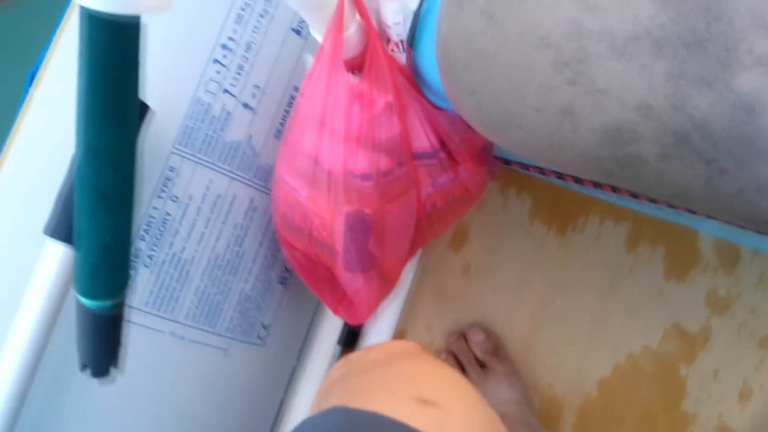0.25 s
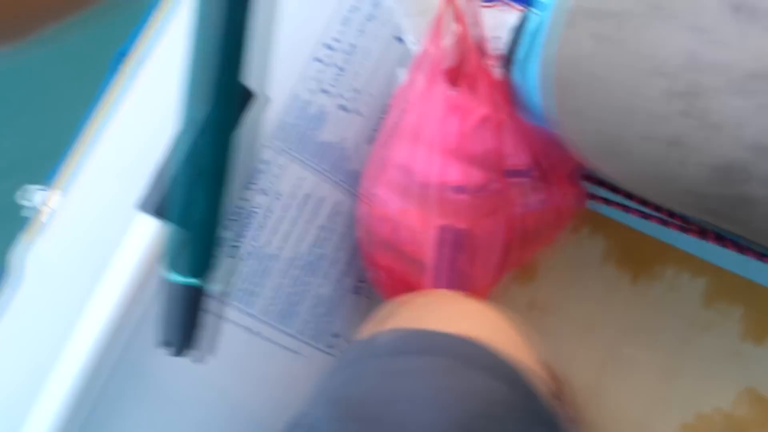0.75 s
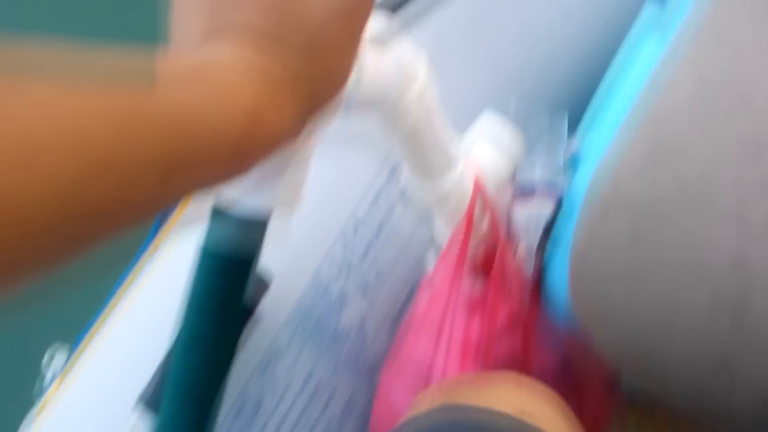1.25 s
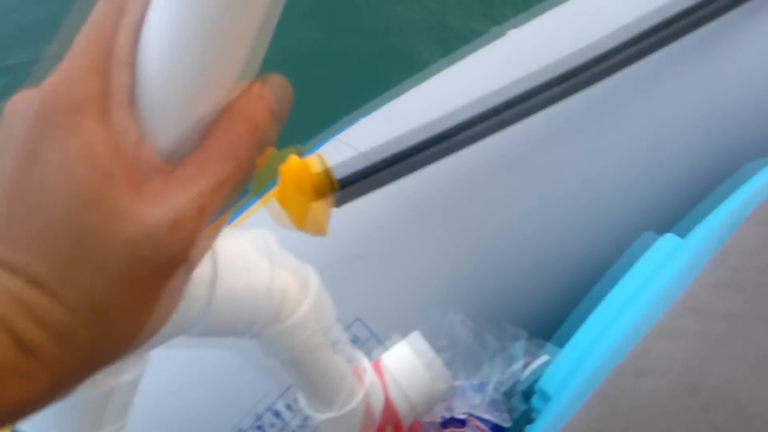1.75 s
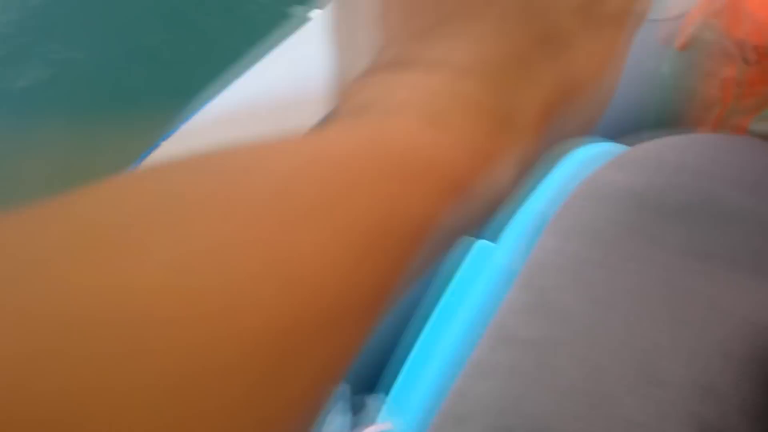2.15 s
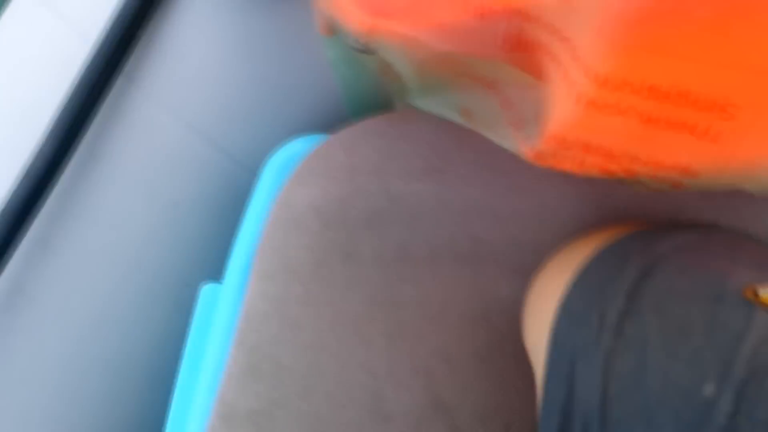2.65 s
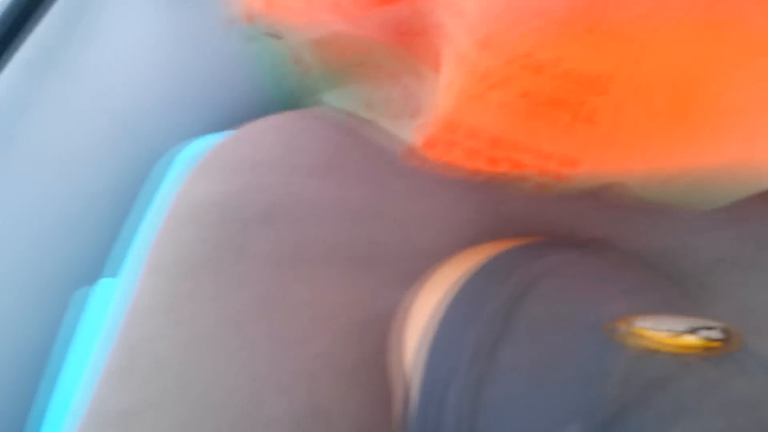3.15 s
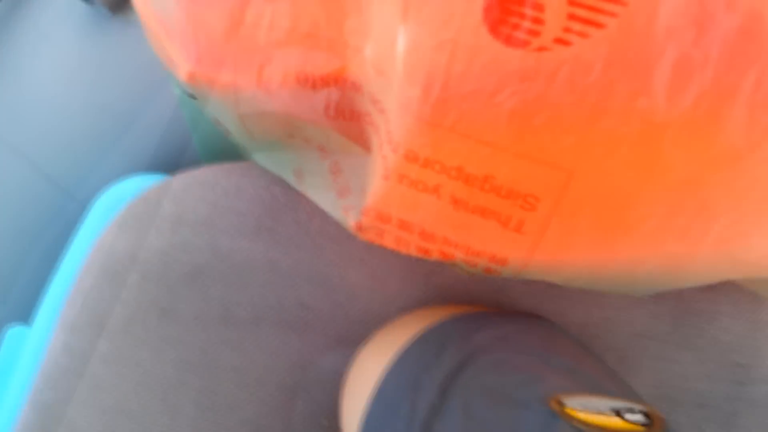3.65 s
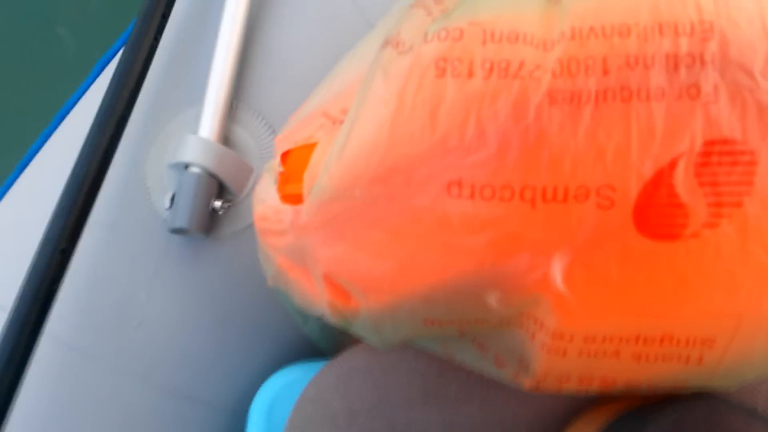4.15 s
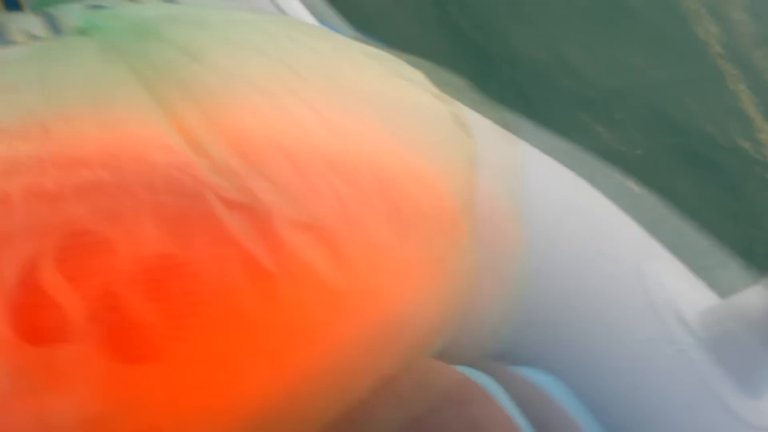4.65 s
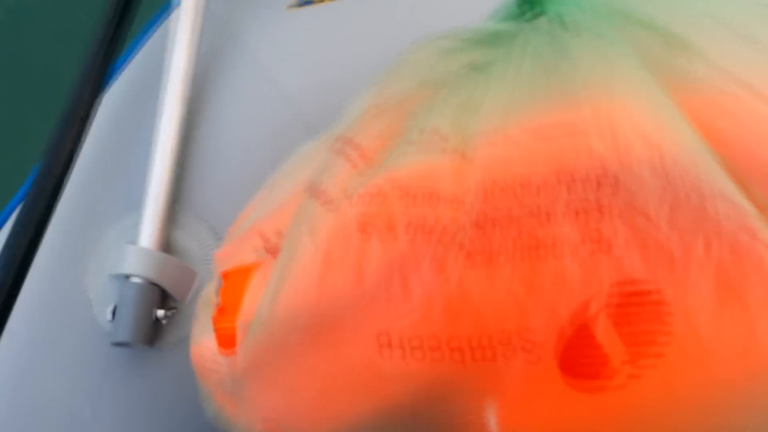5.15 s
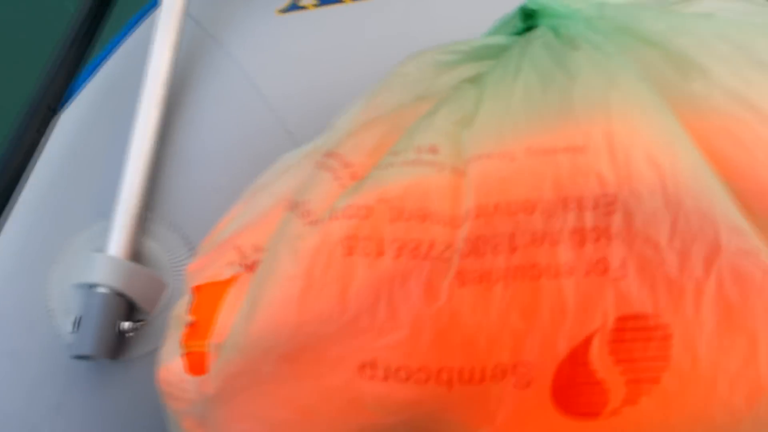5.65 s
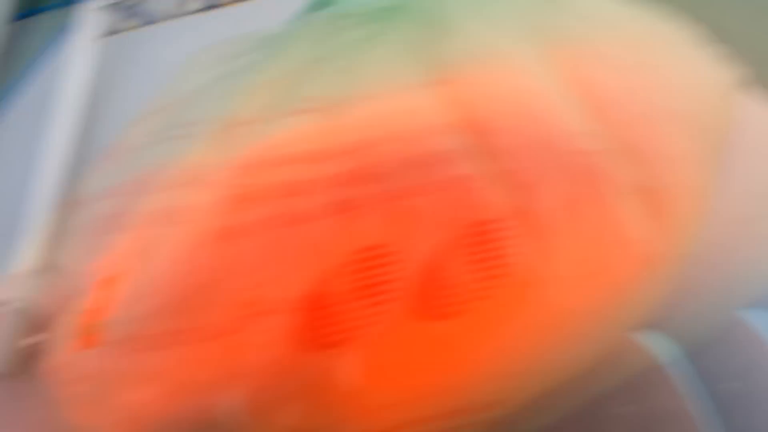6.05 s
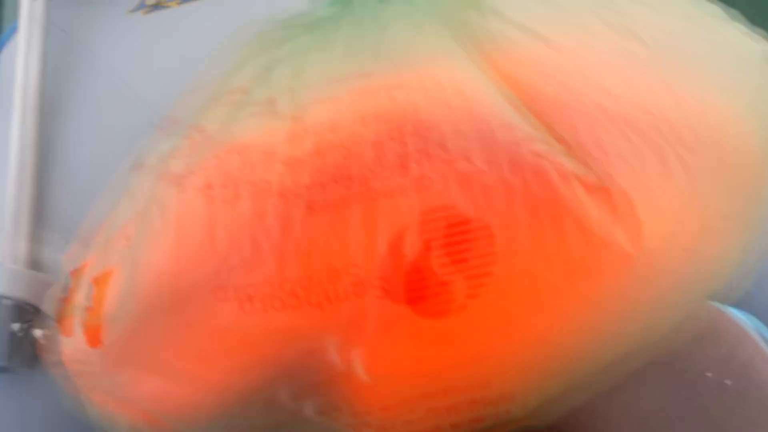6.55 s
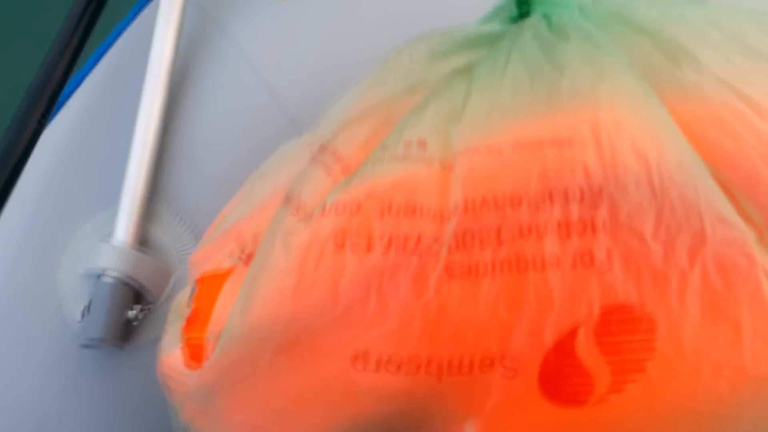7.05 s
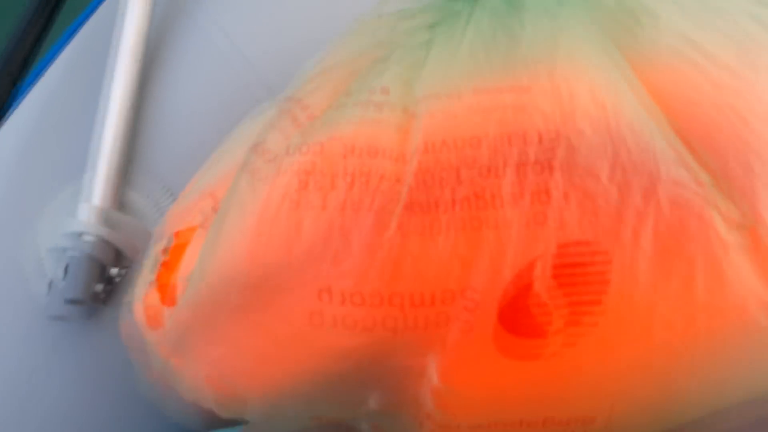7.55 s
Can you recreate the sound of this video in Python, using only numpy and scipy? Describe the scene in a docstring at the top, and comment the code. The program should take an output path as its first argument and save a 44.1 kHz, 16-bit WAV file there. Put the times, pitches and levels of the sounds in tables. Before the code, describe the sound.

Hollow knocks and fabric rubs under buffeting wind, then whirring, clanking pulls of an outboard starter cord, ratcheting back twice, the engine never firing.

```python
"""Wind buffets the microphone throughout, while things knock and rub against the hull of a small inflatable boat at sea.
Then the starter cord of an outboard motor is pulled three times and the engine does not catch.
The pulls whir and clank; after the first two the pawl ratchets as the cord rewinds. Wind, sea, rubs and scraping are
shaped noise; knocks, clanks and ticks strike resonances; the loudest moments overload the microphone's converter."""
import sys
import numpy as np
from scipy import signal
from scipy.io import wavfile
from scipy.ndimage import uniform_filter1d

SR = 44100
rng = np.random.default_rng(int(sys.argv[2]) if len(sys.argv) > 2 else 0)


def to_wav(sig):
    """Store sig (one row per channel, or 1-D mono) as 16-bit WAV at the path in sys.argv[1].

    Samples outside -1..1 are clipped; the rate is SR.
    """
    pcm = np.clip(np.atleast_2d(sig), -1, 1) * 32767
    pcm = np.round(pcm).astype(np.int16)
    wavfile.write(sys.argv[1], SR, pcm.T)  # frames by channels


N = 343980

# Table levels are relative; each function adds its own gains.
RELEASE_S = 0.0054   # time constant at the end of a swell


def amp(db):
    """dB to gain."""
    return 10 ** (np.asarray(db) / 20)


def rms_one(x):
    """Scale to unit rms."""
    return x / np.sqrt(np.mean(x ** 2) + 1e-20)


def in_time(rows, outside=None):
    """Columns of a curve table, one value per sample."""
    s, *columns = np.transpose(rows)
    return [np.interp(np.arange(N) / SR, s, c, left=outside, right=outside) for c in columns]


def drift(rate):
    """Slow chance with about `rate` changes a second; spread about 1."""
    r = np.exp(-40 * np.pi * rate / SR)   # pole near `rate` Hz for noise at SR / 20 samples a second
    white = rng.standard_normal(N // 20 + 2002)
    slow = signal.lfilter([1], [1, -2 * r, r * r], white)[2000:]
    return np.interp(np.arange(N) / 20, np.arange(len(slow)), rms_one(slow - slow.mean()))


def wander(x, share, rate):
    """Play a sound a little faster or slower by turns, so that its resonances glide."""
    lag = np.cumsum(share * drift(rate))
    centred_lag = lag - uniform_filter1d(lag, size=SR // 4)
    return np.interp(np.arange(N) + centred_lag, np.arange(N), x)


def band(x, low_hz, high_hz, order=2):
    """Butterworth band-pass."""
    return signal.sosfilt(signal.butter(order, [low_hz, high_hz], "band", fs=SR, output="sos"), x)


def coloured(spectrum, patchy_db, rate):
    """Half-octave bands of noise at the levels of a spectrum, each flickering; rms 1."""
    hz, level_db = np.transpose(spectrum)
    edges = hz[0] * 2 ** np.arange(0, np.log2(hz[-1] / hz[0]) + .1, .5)
    white, together, out = rng.standard_normal((2, N)), drift(rate), 0
    for k, (low, high) in enumerate(zip(edges, edges[1:])):
        centre_db = np.interp(np.log(low * high) / 2, np.log(hz), level_db)
        flicker_db = patchy_db * (together + 0.75 * drift(rate))
        out = out + amp(centre_db + flicker_db) * band(white[k % 2], low, high)
    return rms_one(out)


def treble_hiss(flicker_db, rate):
    """Bright flickering hiss; rms 1."""
    white = rng.standard_normal(N)
    return rms_one(band(white, 4200, 21000, order=3) * amp(flicker_db * drift(rate)))


def resonate(x, hz, width_hz):
    """Two-pole resonance, gain about 1 on top."""
    r = np.exp(-np.pi * width_hz / SR)
    zeros = np.array([1, 0, -1]) * (1 - r * r) / 2
    return signal.lfilter(zeros, [1, -2 * r * np.cos(2 * np.pi * hz / SR), r * r], x)


def through(x, peaks):
    """Parallel resonances with alternating signs."""
    return sum((-1) ** k * amp(db) * resonate(x, hz, width) for k, (hz, width, db) in enumerate(peaks))


def bursts(times, levels_db, lengths_ms, tail):
    """Envelope of contacts: sudden start, held for the length, then dying with time constant tail x length."""
    out = np.full(N, 1e-9)
    for s, db, ms in zip(times, levels_db, lengths_ms):
        hold = max(ms, .3) * SR / 1000   # samples
        start = round(s * SR)
        n = np.arange(min(int(hold * (1 + 8 * tail)), N - start))
        out[start:start + len(n)] += amp(db) * np.exp(-np.maximum(n - hold, 0) / (hold * tail))
    return out


def swells(start_s, length_s, levels_db, rise, fade_db):
    """Envelope of strokes: smooth rise over a share of the length, slow fall over the rest, quick release."""
    t, out = np.arange(N) / SR, np.full(N, 1e-6)
    for s, length, db in zip(start_s, length_s, levels_db):
        part = slice(round(s * SR), round((s + length + 8 * RELEASE_S) * SR))
        u = (t[part] - s) / length
        up = np.sin(np.pi / 2 * np.minimum(u / rise, 1)) ** 2
        fall = amp(db - fade_db * np.clip((u - rise) / (1 - rise), 0, 1))
        release = np.exp(-np.maximum(u - 1, 0) * length / RELEASE_S)
        out[part] += fall * up * release
    return out


def grit(per_s, spread_db):
    """Dense random contacts of uneven size; rms 1."""
    sizes = amp(spread_db * np.minimum(rng.exponential(1, N), 4)) * rng.choice([-1, 1], N)
    return rms_one(sizes * (rng.random(N) < per_s / SR))


# wind strength at the microphone: (time [s], rumble level [dB])
WIND = [(0.0, -21), (0.43, -12), (0.61, -16), (0.65, -9), (0.98, -13.5), (1.06, -10), (1.97, -18.5),
        (2.3, -11), (2.69, -18), (4.02, -18.5), (4.06, -21.5), (4.13, -16), (4.71, -22), (5.08, -16.5),
        (5.58, -24.5), (6.06, -20), (7.73, -23), (7.8, -23)]
# sudden buffets: (start [s], length [s], rumble level [dB], flutter level [dB])
GUSTS = [(.09, 0.035, -15.5, -36), (0.258, 0.061, -13, -24), (0.387, 0.025, -9, -26),
         (0.42, 0.065, -11, -18), (0.506, 0.097, -21, -15.5), (0.628, 0.07, -8, -17),
         (0.78, 0.039, -12, -28), (0.839, 0.045, -17, -19), (1.046, 0.072, -22, -36),
         (1.389, 0.073, -29, -20), (1.447, 0.05, -10.5, -14), (2.288, 0.07, -5, -17),
         (2.399, 0.05, -17, -29), (2.927, 0.029, -20, -19), (3.183, 0.031, -29, -47),
         (4.038, 0.067, -17, -44), (4.342, 0.064, -19, -27), (4.531, 0.048, -21, -39),
         (4.652, 0.069, -17, -29), (5.1, 0.05, -25, -26), (5.814, 0.054, -27.5, -53),
         (6.128, 0.034, -15, -12), (6.372, 0.037, -15, -22), (6.956, 0.07, -24, -50),
         (7.282, 0.089, -22, -46), (7.362, 0.078, -26.5, -38)]
# rumble spectrum: (frequency [Hz], density [dB per Hz])
RUMBLE = [(12, -34), (20, -3), (38, -1.5), (59, -7), (97, -4.5), (147, -12), (189, -11), (400, -47.5),
          (520, -76), (880, -120)]
LULL_DB = -1.5                             # offset of the wind between buffets
FLUTTER_DB, FLUTTER_FOLLOWS = -42, 1.97    # at a rumble of -20 dB; dB per dB of rumble


def wind():
    """Turbulent eddies on the port: a lumpy rumble and a faster, gustier flutter above it."""
    s, length_s, rumble_db, flutter_db = np.transpose(GUSTS)
    steady = amp(in_time(WIND)[0] + LULL_DB)
    gust_rumble = swells(s, length_s, rumble_db, rise=0.5, fade_db=10.5)
    gust_flutter = swells(s, length_s, flutter_db, rise=0.5, fade_db=10.5)
    rumble = coloured(RUMBLE, patchy_db=1.5, rate=8.1)
    flutter = rms_one(band(rng.standard_normal(N), 210, 426) * amp(5.76 * drift(21)))
    steady_flutter = amp(FLUTTER_DB) * (10 * steady) ** FLUTTER_FOLLOWS
    return (steady + gust_rumble) * rumble + (steady_flutter + gust_flutter) * flutter


# sea along the hull: (time [s], level [dB])
SEA = [(0, -43), (.6, -43.5), (.85, -81), (1.1, -43.5), (3.0, -40.5), (3.3, -47), (5.2, -42.5), (5.8, -45),
       (7.0, -41), (7.4, -47.5), (7.8, -34.5)]
# sea spectrum: (frequency [Hz], density [dB per Hz])
SEA_HISS = [(240, -53.5), (400, 1.5), (580, -2.5), (626, -4), (930, -1), (1080, -3), (2060, -11),
            (2790, -16), (8500, -28), (11000, -86), (18700, -120)]


def sea():
    """Water washing along the hull: flickering hiss on a slow level curve."""
    return amp(in_time(SEA)[0] + 2.5) * coloured(SEA_HISS, patchy_db=2.5, rate=24)


# hands and bags on the hull fabric: (start [s], length [s], hiss level [dB], treble level [dB])
RUBS = [(0.076, 0.045, -37, -46), (0.143, 0.029, -41, -48), (0.279, 0.014, -33.5, -69),
        (0.335, 0.05, -35, -40), (0.387, 0.045, -37, -55), (0.472, 0.024, -36.5, -62),
        (0.19, .08, -50, -85), (0.42, .05, -47, -80), (0.537, .12, -44, -78), (0.713, 0.031, -41, -66),
        (0.866, .04, -65, -77), (0.916, 0.047, -43, -80), (1.003, .13, -26, -28.5),
        (1.112, 0.27, -35.5, -38), (1.335, 0.095, -29.5, -59), (1.429, 0.34, -37, -41),
        (1.707, 0.27, -31, -30), (1.928, 0.37, -41, -42.5), (2.366, 0.19, -40.5, -44.5),
        (2.55, 0.15, -40, -55), (2.648, 0.23, -39.5, -44), (2.878, 0.21, -37.5, -43.5),
        (3.055, 0.13, -34.5, -41), (3.183, .13, -43, -51.5), (3.408, 0.041, -50, -86),
        (3.503, 0.034, -43, -73), (3.62, 0.15, -49.5, -68), (3.757, 0.15, -44.5, -57),
        (3.924, 0.1, -49.5, -85), (4.08, 0.14, -47, -80), (5.2, 0.6, -55, -74), (5.7, .3, -47, -70),
        (6.92, .38, -50, -85), (7.42, .2, -52, -85)]
# fabric spectrum: (frequency [Hz], density [dB per Hz])
FABRIC = [(710, -30), (1200, -4.5), (2010, -7), (2630, 8.5), (3560, -7), (6700, -0.5), (9000, -31),
          (11700, -54), (19800, -120)]


def rubs():
    """Friction on hull fabric: bright, uneven hiss in strokes."""
    s, length_s, hiss_db, treble_db = np.transpose(RUBS)
    hiss = swells(s, length_s, hiss_db, rise=0.26, fade_db=9)
    treble = swells(s, length_s, treble_db, rise=0.26, fade_db=9)
    return hiss * coloured(FABRIC, patchy_db=3.5, rate=58) + treble * treble_hiss(4.75, 20)


# drops into bilge water: (time [s], level [dB], start pitch [Hz], end pitch [Hz], length [s])
DROPS = [(2.679, -25, 563, 1330, 0.05), (2.938, -34, 886, 1340, 0.031)]


def drops():
    """A bubble whose pitch rises as it nears the surface."""
    out = np.zeros(N)
    for s, db, start_hz, end_hz, length_s in DROPS:
        u = np.linspace(0, 1, int(length_s * SR))
        phase = 2 * np.pi * np.cumsum(start_hz + (end_hz - start_hz) * u) / SR
        out[round(s * SR):][:len(u)] += amp(db) * np.sin(np.pi * u) * np.sin(phase)
    return out


# knocks on hull and tubes; the rows at 4.198 s and 4.413 s add a heavy thud to starter clanks: (time [s], peak
# level [dB], crack level [dB], snap level [dB], pitch [Hz])
KNOCKS = [(0.101, -8, -14.5, -11, 403), (0.263, -9, -35, -56, 378), (0.288, -11.5, -24.5, -49, 416),
          (0.299, -8, -45, -60, 340), (0.370, -13, -13, 3, 586), (0.374, -18, -12, 5, 560),
          (0.427, -10, -26, -31, 383), (0.441, -10, -35, -50, 340), (0.458, -12, -25, -40, 400),
          (0.490, 5, -8, -41, 431), (0.527, -10.5, -28, -54, 360), (0.653, -9, -50, -55, 340),
          (0.741, -18.5, -42, -56, 514), (0.793, -21, -50, -92, 347), (0.851, -5, -47, -56, 435),
          (0.935, -19, -25.5, -58, 430), (1.122, -26, -26, -34, 360), (1.231, -11.5, -32, -43, 343),
          (1.248, -5.5, -13.5, -39, 501), (1.343, -3.5, -6, -2, 780), (1.368, -3.5, -9.5, -25, 517),
          (1.376, -8, -12, -20, 493), (1.404, 1.5, -14, -47, 333), (1.430, -15, -16, -43, 600),
          (1.442, 0.5, -16, -51, 452), (1.474, -11, -17, -15, 465), (1.514, -12, -21, -34, 400),
          (1.549, -3.5, -14.5, -3, 430), (1.609, -3.5, -16, -12, 415), (1.922, -19, -50, -60, 447),
          (2.026, -4.5, -21, -36, 636), (2.15, -7.5, -41, -43, 637), (2.259, -5.5, -22, -32, 369),
          (2.285, -17, -27, -45, 426), (2.312, -11, -43, -44, 360), (2.323, -5, -40, -48, 385),
          (2.331, -5.5, -15, -45, 500), (2.342, -10.5, -15, -49, 417), (2.353, -14, -40, -55, 377),
          (2.455, -33, -43, -33, 420), (2.535, -22.5, -30, -50, 910), (2.552, -8, -3, -6, 617),
          (2.63, -15.5, -20, -43, 734), (2.926, -2.5, -36, -36, 477), (3.161, -14, -22, -47, 486),
          (3.318, -32, -41, -64, 371), (3.46, -28, -43, -60, 353), (3.619, -20, -40, -26, 336),
          (4.058, -32, -53, -87, 484), (4.198, -12, -25, -40, 800), (4.413, -2, -22, -40, 600),
          (6.137, -8, -25, -45, 420), (6.806, -12, -30, -50, 600), (6.874, -16, -35, -55, 500)]
# hull modes in the crack of any knock: (frequency [Hz], width [Hz], level [dB])
HULL_LOW = [(900, 300, 0.5), (1450, 330, 1.5)]
# hull modes added by hard knocks: (frequency [Hz], width [Hz], level [dB])
HULL_HIGH = [(2310, 340, -1.5), (3270, 470, -9)]


def knocks():
    """Each knock is one soft push that rings the tube, with a crack, a bright snap and a hollow tail in the hull."""
    s, peak_db, crack_db, snap_db, pitch_hz = np.transpose(KNOCKS)
    out, noise = np.zeros(N), rng.standard_normal((3, N))
    t = np.arange(SR // 10) / SR
    for start_s, db, hz in zip(s, peak_db, pitch_hz):
        push = np.sin(np.pi * np.minimum(1.31 * hz * t, 1)) ** 2   # contact lasts under one cycle
        thud = resonate(push, hz, 107)
        thud += amp(-1.0) * resonate(push, 0.48 * hz, 119)
        thud -= amp(-11.0) * resonate(push, 2.34 * hz, 370)
        out[round(start_s * SR):][:len(t)] += amp(db + 3.5) * thud / np.abs(thud).max()
    hard_db = (crack_db + snap_db) / 2
    crack = sum(through(noise[0] * bursts(s, db + 7.0, 1.8 + 0 * s, tail=1.3), modes)
                for db, modes in [(crack_db, HULL_LOW), (hard_db, HULL_HIGH)])
    snap = rms_one(band(noise[1], 3300, 7700)) * bursts(s, snap_db - 15.5, 1.6 + 0 * s, tail=1.0)
    hollow_env = bursts(s + 0.001204, peak_db - 17.0, 5.1 + 0 * s, tail=1.78)
    hollow = rms_one(band(noise[2], 360, 825)) * hollow_env
    return out + crack + snap + hollow


# handle hits its stop at the end of a rewind: (time [s], level [dB])
STOPS = [(5.1134, -12.5), (6.895, -10.5), (6.908, -15)]
# cowl modes: (frequency [Hz], level [dB], t60 [s])
COWL = [(1080, -5, 0.029), (1750, -2, .008), (1980, -8, .02), (2110, -3, .028), (2490, 0, 0.008),
        (3750, -5, .007), (4530, -7, 0.008), (5700, -9, .005)]


def stops():
    """One hard click rings the modes of the cowl, each with a strength of its own."""
    out, t = np.zeros(N), np.arange(SR // 20)[:, None] / SR
    hz, mode_db, t60_s = np.transpose(COWL)
    for (s, db), uneven in zip(STOPS, rng.standard_normal((len(STOPS), len(hz)))):
        decay = amp(db + mode_db + 1.2 * uneven - 60 * t / t60_s)
        out[round(s * SR):][:len(t)] += (decay * np.sin(2 * np.pi * hz * t)).sum(axis=1)
    return out


# housing modes: (frequency [Hz], width [Hz], level [dB])
HOUSING = [(1088, 144, 2), (2200, 460, 2.5), (2790, 370, -6)]


def contacts(s, squeak_db, thud_db, ms, squeak_lag_s):
    """Chatter of steel on steel: a thud of the housing, then a bright squeak of the drum."""
    noise = rng.standard_normal((2, N))
    bright = noise[0] * bursts(s + squeak_lag_s, squeak_db, ms, tail=0.66)
    dull = noise[1] * bursts(s, thud_db, ms, tail=1.0)
    narrow = resonate(resonate(bright, 7080, 380), 7150, 800)
    squeak = amp(11.0) * narrow + amp(-19.0) * band(bright, 5800, 7100)
    thud = amp(9.0) * through(dull, HOUSING) + amp(1.5) * band(dull, 580, 3900)
    return squeak + thud


def clangs(s, levels_db, ms, pitches_hz, q):
    """A burst of chatter through one resonance, another for each contact."""
    out = np.zeros(N + SR)
    n, noise = np.arange(SR // 10), rng.standard_normal((len(s), SR // 10))
    for start_s, db, hold, hz, hiss in zip(s, levels_db, ms * SR / 1000, pitches_hz, noise):
        chatter = hiss * np.exp(-np.maximum(n / hold - 1, 0))
        out[round(start_s * SR):][:len(n)] += amp(db + 16) * resonate(chatter, hz, hz / q)
    return out[:N]


# starter cup modes: (frequency [Hz], level [dB], t60 [s])
STARTER_CUP = [(3190, -12, .04), (3535, -10.5, 0.15), (4390, -15, .04), (4845, -15, .3), (4864, -1, 0.08),
               (4925, -9, .045), (6000, -12, .05), (6770, -11, .18), (6890, -12, 0.2), (7150, 4, .045),
               (7310, -8, .07), (7530, -12, .05), (11015, -11, 0.045), (11515, -12, .04), (11590, -15, .03),
               (14900, -14, .025), (15300, -18, .025)]
BELL_HZ = 5000               # modes within 500 Hz take the bell level
STRIKE_DB, DRAG_DB = 4.5, -27.5   # click that starts the ring; drag that keeps it going


def cup_ring(s, ring_db, bell_db, drag_ms):
    """A click rings the starter cup's modes and a short drag keeps them going; each contact strikes unevenly."""
    uneven_db = 3.5 * rng.standard_normal((len(s), len(STARTER_CUP)))
    out, noise = 0, rng.standard_normal(N)
    for (hz, db, t60_s), extra_db in zip(STARTER_CUP, uneven_db.T):
        r, w = amp(-60 / (t60_s * SR)), 2 * np.pi * hz / SR
        level_db = ring_db + db + extra_db + bell_db * (abs(hz - BELL_HZ) < 500)
        drive = noise * bursts(s, level_db + DRAG_DB, drag_ms, tail=0.31)
        drive[(s * SR).astype(int)] += amp(level_db + STRIKE_DB)
        out = out + signal.lfilter([0, np.sin(w)], [1, -2 * r * np.cos(w), r * r], drive)
    return out


# starter clanks: (time [s], squeak level [dB], thud level [dB], snap level [dB], chatter [ms],
#                  clang pitch [Hz], cup ring level [dB])
CLANKS = [(3.908, -36, -37, -27, 1.5, 4000, -70), (4.138, -50, -34, -55, 3, 1100, -70),
          (4.177, -16.5, -27, -42, 4.2, 1190, -44), (4.199, -20, -13.5, -35, 2.2, 845, -47),
          (4.365, -30, -24, -40, 4, 1100, -55), (4.414, -17, -29, -38, 3, 620, -50),
          (4.442, 0, -19, -12, 10.7, 4300, -58.5), (4.526, -30, -13.5, -28, 6, 1000, -45),
          (4.544, -28, -12, -35, 3, 2000, -50), (4.564, -19, -18.5, -38, 3.4, 1160, -45),
          (4.612, -21, -14, -31, 6, 2020, -44.5), (4.689, -14, -14.5, -32, 3.4, 1040, -35),
          (5.113, -37, -20, -38, 2.9, 2080, -40), (5.197, -36, -39, -28, 4.6, 1960, -48),
          (5.533, -29, -51, -21, 1.1, 1980, -61), (5.924, -13, -16, -7.5, 6.5, 3550, -23),
          (6.122, -16.5, -35, -37, 1.8, 2400, -46), (6.137, -32.5, -26.5, -36, 1.7, 1300, -44),
          (6.181, -1, -20, -5.5, 9.3, 2100, -53), (6.228, -20, -8, -35, 7.6, 1570, -47),
          (6.234, -23, -23, -38, 5.7, 1550, -50), (6.255, -12, -24, -39, 2.9, 1000, -50),
          (6.267, -18, -26, -7, 1.5, 4400, -48), (6.287, -5.5, -37, -30, 1.9, 800, -45),
          (6.311, -19, -45.5, -15, 2.2, 1000, -50), (6.330, -19, -42, -16, 3.7, 2500, -52),
          (6.368, -20, -24.5, -15, 3.9, 3880, -52), (6.369, -30, -22, -30, 4, 6040, -60),
          (6.373, -30, -25, -40, 3.6, 2150, -60), (6.387, -22, -26, -26, 1.5, 4000, -50),
          (6.895, -17, -18, -35, 1.85, 1140, -23.5), (7.528, -38, -49, -53, 3, 2000, -56),
          (7.584, -50, -35, -50, 2, 2000, -65), (7.716, -28, -28, -45, 6, 4900, -40),
          (7.751, -28, -32, -38, 2.5, 4900, -48)]


def clanks():
    """Heavy steel contacts of the starter, each with a wide snap, a clang and a cup ring."""
    s, squeak_db, thud_db, snap_db, ms, clang_hz, ring_db = np.transpose(CLANKS)
    wide = rms_one(band(rng.standard_normal(N), 5000, 13000, order=1))
    snap = wide * bursts(s, snap_db - 16.5, 0.54 * ms, tail=0.2)
    contact = contacts(s, squeak_db, thud_db, ms, squeak_lag_s=0.00032)
    ring = cup_ring(s, ring_db, bell_db=-7, drag_ms=ms)
    return contact + snap + ring + clangs(s, thud_db, ms, clang_hz, q=13)


# pawl ticks: (time [s], squeak level [dB], thud level [dB], clang pitch [Hz], cup ring level [dB],
#              bell modes over ring [dB])
TICKS = [(4.7365, -21, -18.5, 1970, -25, 4), (4.7576, -25, -19, 2760, -25, 3),
         (4.780, -21, -18, 1360, -25.5, 3), (4.7995, -27, -18.5, 1510, -28, -1),
         (4.818, -17, -18, 2070, -25, 0), (4.8413, -27, -20, 1350, -30, 1), (4.857, -14, -19, 1060, -29, 3),
         (4.8798, -20, -16, 1200, -28.5, 6.5), (4.9036, -17, -20, 1730, -31, 4),
         (4.927, -20, -21, 937, -33, 2), (4.9598, -14.5, -18.5, 1070, -32, 8),
         (4.996, -19.5, -19, 921, -34, 0), (5.0448, -17.5, -24, 2030, -36, -3),
         (5.069, -25, -55, 900, -43, -6), (6.453, -18, -20, 2450, -26, -6),
         (6.468, -16, -18.5, 1500, -25, -7), (6.482, -13, -19, 2020, -27, -4),
         (6.4939, -14, -17, 2080, -24, -3), (6.5121, -11.5, -15.5, 1470, -26.5, -1),
         (6.5442, -20, -18, 3170, -26, -7), (6.58, -18, -20, 2300, -30, 2),
         (6.617, -12, -19, 1070, -32, -8), (6.654, -21, -20.5, 2100, -33, 3),
         (6.6822, -19, -15.5, 920, -33, 2), (6.7051, -16, -18.5, 1280, -33, 2),
         (6.735, -12, -18.5, 1090, -32, -3), (6.769, -17, -18.5, 1130, -31, -9),
         (6.815, -13, -21, 872, -31, -10), (6.9061, -18, -22, 1110, -30, -10)]


def ticks():
    """While the cord rewinds, the pawl skips over the teeth of the starter cup, then drags and keeps it ringing."""
    s, squeak_db, thud_db, clang_hz, ring_db, bell_db = np.transpose(TICKS)
    chatter_ms = 3.6 * amp(2.6 * rng.standard_normal(len(s)))
    clang = clangs(s, thud_db - 3, chatter_ms, clang_hz, q=9)
    ring = cup_ring(s + 0.002, ring_db, bell_db, drag_ms=12 + 0 * s)
    return contacts(s, squeak_db, thud_db, chatter_ms, squeak_lag_s=0.002) + ring + clang


# cord drawn out, one list per pull: (time [s], engine body level [dB], cord drum level [dB])
PULLS = [
    [(4.19, -28, -43), (4.26, -28, -32), (4.35, -28, -29), (4.41, -17.5, -27), (4.44, -17.5, -31),
     (4.49, -20, -30), (4.53, -15, -27), (4.59, -21.5, -36), (4.672, -33.5, -35.5), (4.73, -25, -27)],
    [(5.93, -29, -31), (5.97, -40, -35.5), (6.04, -21, -27.5), (6.1, -26, -33), (6.174, -17.5, -28),
     (6.214, -20.5, -24), (6.232, -12, -27), (6.356, -34.5, -39), (6.42, -31, -36), (6.45, -26.5, -33)],
    [(7.54, -50, -52), (7.58, -40, -42), (7.62, -36, -38), (7.66, -32, -34.5), (7.702, -25.5, -31),
     (7.73, -29, -25.5), (7.8, -48, -32)],
]
# spring running the cord back: (start [s], length [s])
REWINDS = [(4.726, 0.38), (6.446, 0.45)]
# engine body modes: (frequency [Hz], width [Hz], level [dB])
ENGINE_BODY = [(226, 15, -7), (401, 32, 4), (687, 103, -4.5), (1120, 360, -6), (1458, 220, -7.5),
               (2130, 590, -10.5)]
# cord drum modes: (frequency [Hz], width [Hz], level [dB])
DRUM = [(3600, 1100, -13), (6060, 850, -5.5), (7350, 590, -2)]
# one per pull: (whine level [dB])
WHINES_DB = [-12, 5, -2]
# one per pull: (whirr level [dB])
WHIRRS_DB = [2, -1, -2]
REWIND_BODY_DB, REWIND_DRUM_DB = -31, -34
TREBLE_DB, TREBLE_FOLLOWS = -57, 1.2         # at a drum level of -30 dB, before the mix trim; dB per dB of drum
SHUDDER_DB, SHUDDER_FOLLOWS = -18.5, 0.71    # at a body level of -20 dB; dB per dB of body
WHIRR_START_HZ, WHIRR_END_HZ, WHIRR_SAG_S = 3950, 3390, 0.14   # sags after the cord catches
WHIRR_PEAK_S, WHIRR_FADE_S = 0.09, 0.05      # dies back as the load comes on
WHINE_TOP_HZ, WHINE_DROP_HZ = 1170, 170      # pitch arches with the whine's strength
WHINE_WOBBLE_HZ, WHIRR_WOBBLE_HZ = 18, 150
BODY_WANDER, DRUM_WANDER = .08, .04          # share by which the resonances wander in pitch


def pulls_and_rewinds():
    """The cranked engine rattles its body as the cord scrapes and whirs over its drum, drawn out or run back."""
    s, length_s = np.transpose(REWINDS)
    back = swells(s, length_s, 0 * s, rise=0.046, fade_db=12)
    cranked, drawn = sum(amp(in_time(stroke, -120)) for stroke in PULLS)
    body, drum = cranked + amp(REWIND_BODY_DB) * back, drawn + amp(REWIND_DRUM_DB) * back
    treble = amp(TREBLE_DB) * (drum / amp(-30)) ** TREBLE_FOLLOWS

    t, catches_s = np.arange(N) / SR, np.array([0] + [stroke[0][0] for stroke in PULLS])
    stroke_now = np.searchsorted(catches_s, t, side="right") - 1
    since_s = t - catches_s[stroke_now]

    rattle = amp(1.5 * drift(60))   # uneven contact shakes body and drum together
    shake, scrape = grit(1000, 3.4), grit(2600, 3.6)
    body_modes = wander(through(shake, ENGINE_BODY), BODY_WANDER, 8.99)
    shake = body_modes + amp(-16.5) * band(shake, 250, 2300, order=1)
    drum_modes = through(scrape, DRUM) + amp(-9) * band(scrape, 2300, 4800)
    scrape = rms_one(rattle * wander(drum_modes, DRUM_WANDER, 11.9))

    free = np.exp(-((since_s - WHIRR_PEAK_S) / WHIRR_FADE_S) ** 2)
    whine_hz = WHINE_TOP_HZ - WHINE_DROP_HZ * (1 - free) + WHINE_WOBBLE_HZ * drift(40)
    whine_level = amp(WHINES_DB)[stroke_now - 1] * (1.1 + 0.5 * drift(70))
    whine = whine_level * np.cos(2 * np.pi * np.cumsum(whine_hz) / SR)

    whirr_hz = WHIRR_END_HZ + (WHIRR_START_HZ - WHIRR_END_HZ) * np.exp(-since_s / WHIRR_SAG_S)
    turns = np.cumsum(whirr_hz + WHIRR_WOBBLE_HZ * drift(25)) / SR
    gliding_noise = drift(230) * np.cos(2 * np.pi * turns)   # narrow band
    whirr = (0.11 + free) * amp(WHIRRS_DB)[stroke_now - 1] * gliding_noise + free * whine

    shudder = rms_one(band(rng.standard_normal(N), 200, 480) * amp(2.5 * drift(30)))
    low = amp(SHUDDER_DB) * (10 * body) ** SHUDDER_FOLLOWS * (body > 1e-4) * shudder
    drum_sound = drum * (amp(-1.3) * scrape + amp(0.5) * whirr)
    mix = body * rms_one(rattle * shake) + drum_sound + treble * treble_hiss(3.9, 35)
    return low + amp(-0.5) * mix


def scene():
    """All sources at one microphone."""
    background = wind() + sea() + rubs() + drops() + knocks()
    starter = stops() + clanks() + ticks() + pulls_and_rewinds()
    return (background + starter)[None]


CUTOFF_HZ = 16700   # stopband edge


def record(dry):
    """The converter overloads just below full scale; the top is cut."""
    clipped = np.clip(dry, -.98, .98)
    return signal.sosfilt(signal.cheby2(24, 85, CUTOFF_HZ, fs=SR, output="sos"), clipped)


dry = scene()
out = record(dry)
to_wav(out)
```